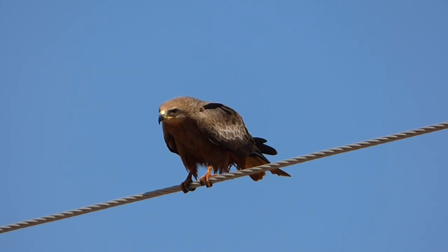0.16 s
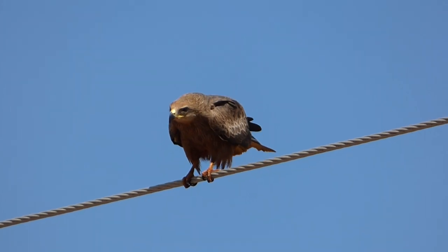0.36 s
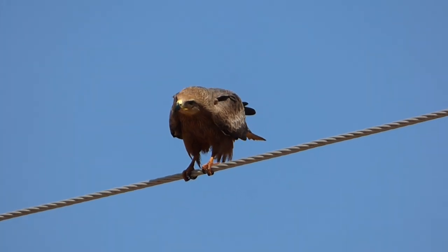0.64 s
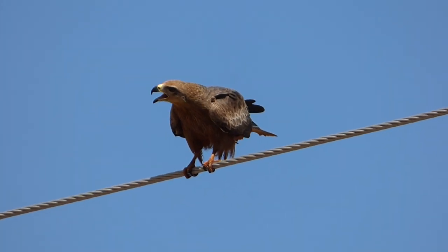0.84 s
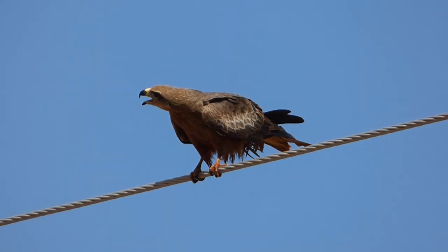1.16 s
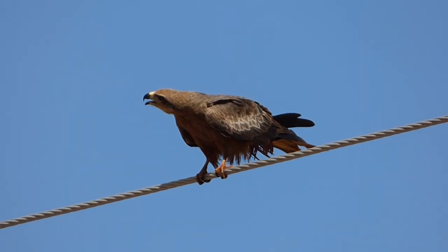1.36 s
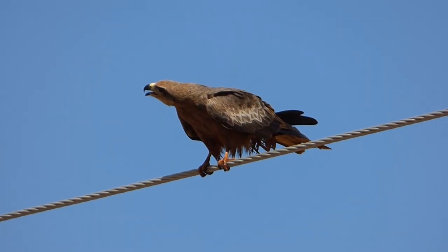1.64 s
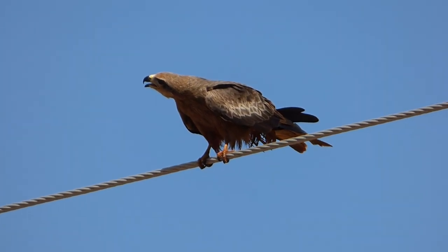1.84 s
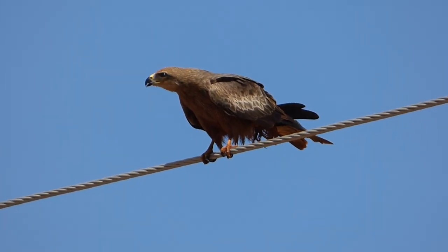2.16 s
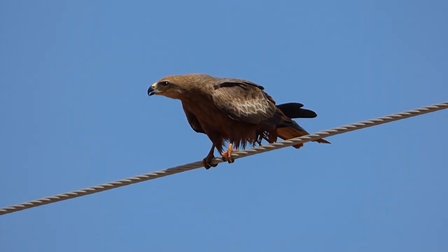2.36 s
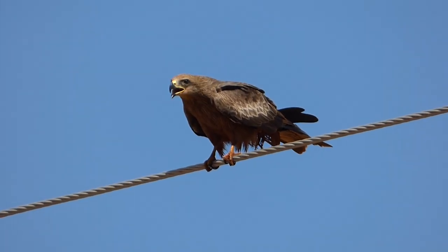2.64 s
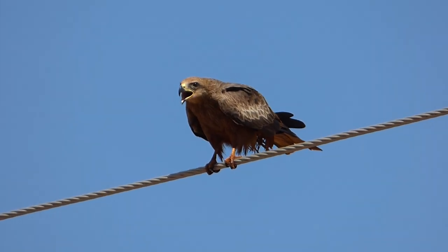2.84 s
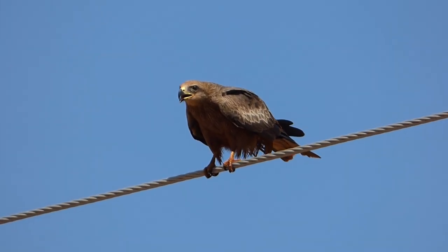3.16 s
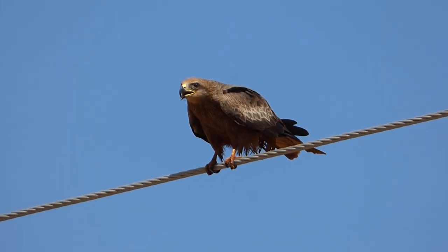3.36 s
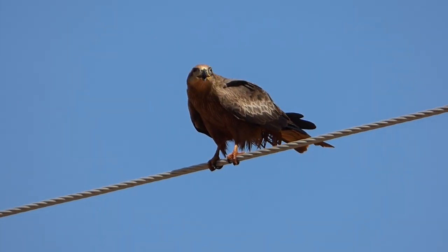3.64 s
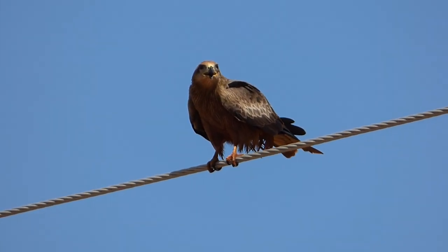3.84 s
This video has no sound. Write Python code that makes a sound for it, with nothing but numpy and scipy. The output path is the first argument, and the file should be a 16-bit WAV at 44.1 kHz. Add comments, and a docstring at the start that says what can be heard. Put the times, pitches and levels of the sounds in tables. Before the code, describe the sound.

In the open air, a bird of prey gives a high whistle that slides into a wavering trill, pauses, then calls again more shrilly. Behind it are a faint far-off drone and soft wind puffs on the microphone.

```python
"""A black kite calls twice from a wire: each call is a sharp falling whistle that runs into a long trill.
Its syrinx sings a nearly pure tone, roughened by fluttering membranes and coloured by the throat,
which rasps at the edges of the notes. The second call is brighter and breaks upward twice.
Light wind bumps the microphone over a distant rush with a surging drone, and there are two tiny ticks."""
import sys
import numpy as np
from scipy import signal
from scipy.fft import rfft, irfft, next_fast_len
from scipy.io import wavfile
from scipy.ndimage import uniform_filter1d, map_coordinates

SR = 44100
rng = np.random.default_rng(int(sys.argv[2]) if len(sys.argv) > 2 else 0)


def file_out(sig):
    """Save sig as 16-bit WAV at sys.argv[1]."""
    # one column per channel
    cols = np.atleast_2d(sig).T
    # limit, then scale
    lim = np.clip(cols, -1, 1)
    pcm = np.round(lim * 32767).astype(np.int16)
    wavfile.write(sys.argv[1], SR, pcm)


N = 176400

# The throat's resonances. Each row: frequency in Hz, gain in dB for each pass through them.
THROAT = [(1800, -13.5), (2190, -1.5), (3600, 3), (4300, -1), (10600, -1), (11300, -7), (12400, 0)]


def amp(db):
    """Decibels to gain."""
    return 10 ** (np.asarray(db) / 20)


def unit(x):
    """Scale to rms 1."""
    return x / np.sqrt(np.mean(x ** 2) + 1e-20)


def clock():
    """Time of each sample in seconds."""
    return np.arange(N) / SR


def along(points, hz):
    """Read a curve of (Hz, value) points on a log frequency axis."""
    f, v = np.transpose(points)
    return np.interp(np.log(hz + 1), np.log(f + 1), v)


def curves(rows):
    """One automation curve for each column after the time."""
    times, *columns = np.transpose(rows)
    return [np.interp(clock(), times, column) for column in columns]


def wobble(rate):
    """A smooth random curve, rate knots a second."""
    return map_coordinates(rng.standard_normal(int(N * rate / SR) + 4), [np.arange(N) * rate / SR])


def filtered(x, response):
    """Filter x by a gain given as a function of Hz."""
    size = next_fast_len(N + 8192)
    return irfft(rfft(x, size) * response(np.fft.rfftfreq(size, 1 / SR)), size)[..., :N]


def coloured(x, points):
    """EQ x by (Hz, dB) points, then scale to rms 1."""
    return unit(filtered(x, lambda hz: amp(along(points, hz))))


def panned(x, balance):
    """Pan each frequency by (Hz, left minus right dB) points."""
    return filtered(x, lambda hz: amp(np.outer([.5, -.5], along(balance, hz))))


def turns(hz):
    """Running phase of a frequency curve, in radians."""
    return 2 * np.pi * np.cumsum(hz) / SR


def gate(start, end, edge):
    """Open and close with soft fades, edge seconds long."""
    t = clock()
    return np.sin(np.pi / 2 * np.clip(np.minimum(t - start, end - t) / edge + .5, 0, 1)) ** 2


def bell(centre, half):
    """A bell-shaped envelope, down to 1/e at half seconds either side of its centre."""
    return np.exp(-((clock() - centre) / half) ** 2)


def swells(rows):
    """Bell-shaped swells of (centre s, half length s, dB), summed in power."""
    return np.sqrt(sum((amp(db) * bell(s, half)) ** 2 for s, half, db in rows))


def distant_rush():
    """A hollow, far-off bed of noise whose level wavers."""
    # EQ of the mid and side channels. Each row: frequency in Hz, relative level in dB.
    mid_colour = [(25, -24.5), (125, -7.5), (220, -14), (350, -6), (395, -15.5), (455, 3), (560, -17),
                  (640, -8), (745, -1.5), (880, -15.5), (1190, -12.5), (3000, -52)]
    side_colour = [(240, -32), (455, -14), (565, -21), (635, -9.5), (790, -5.5), (3000, -51.5)]
    # Stereo lean. Each row: frequency in Hz, left minus right in dB.
    balance = [(290, 1), (470, -9.5), (650, 4.5), (820, -6), (1200, -1)]
    common, own = rng.standard_normal((2, N))
    shifted = filtered(common, lambda hz: np.exp(1.18j))  # both ports hear it, out of phase
    mid = amp(-50.5) * coloured(common, mid_colour)
    side = amp(-51) * coloured(.69 * shifted + .62 * own, side_colour)
    return panned(np.array([mid + side, mid - side]), balance) * amp(2 * wobble(45))


def hiss_and_hum():
    """A thin, wide hiss and a weak low hum toward the right."""
    # EQ of the hiss. Each row: frequency in Hz, relative level in dB.
    colour = [(1000, -24), (1900, -2), (9000, -13.5), (15500, -19)]
    hum_hz = 159
    hiss = amp(-65.5) * coloured(rng.standard_normal((2, N)) + .93 * rng.standard_normal(N), colour)
    hum = amp(-65) * np.sin(turns(hum_hz * (1 + .0066 * wobble(5.33))))
    return hiss + np.outer([.7, 1.6], hum)


def wind():
    """Puffs strike the microphone's ports, mostly the left; the hardest boom for a few cycles."""
    # Soft puffs. Each row: centre in seconds, half length in seconds, level on the left in dB.
    bumps = [(.73, 0.13, -52), (0.88, 0.064, -43), (1.325, 0.1, -40), (1.55, 0.11, -51.5),
             (2.983, 0.02, -47.5)]
    # Their rumble. Each row: frequency in Hz, relative level in dB.
    colour = [(25, -20), (110, -0.5), (220, -5), (700, -65)]
    # Hard puffs. Each row: centre in seconds, half length in seconds, envelope peak on the left in dB.
    hard_puffs = [(1.247, 0.0065, -34), (1.448, 0.0058, -26)]
    boom_hz = 171.6
    eddies = rng.standard_normal((2, N)) + rng.standard_normal(N)
    booms = sum(amp(db) * bell(s, half) * np.sin(2 * np.pi * boom_hz * (clock() - s))
                for s, half, db in hard_puffs)
    return (swells(bumps) * coloured(eddies, colour) + booms) * amp([[0 + 1], [-9]])


def drone():
    """A far, wavering tone that comes and goes."""
    # Its surges. Each row: centre in seconds, half length in seconds, level in dB.
    surges = [(.93, 0.15, -51.5), (1.33, 0.15, -54), (2.75, .35, -57), (3.77, 0.088, -52.5)]
    pitch_hz, wander = 734, .01433
    return swells(surges) * np.sqrt(2) * np.sin(turns(pitch_hz * (1 + wander * wobble(60))))


def rasps():
    """Slow, uneven pulses and air ring in the throat's resonances."""
    # Each row is a rasp: start in seconds, length in seconds, pulse rate in Hz, level in dB.
    bursts = [(0.922, 0.032, 874, -54), (1.259, 0.04, 771, -50.5), (1.343, 0.02, 800, -52),
              (3.913, 0.0306, 745, -47.5), (3.976, 0.017, 779, -46.5)]
    # Their EQ. Each row: frequency in Hz, relative level in dB.
    colour = [(900, -48), (1500, -2), (2300, -0.5), (3100, 8), (4400, -10), (15000, -36)]
    pulse_hz, = curves([(s + length / 2, hz) for s, length, hz, _ in bursts])
    phase = turns(pulse_hz * (1 + .05 * wobble(250)))
    pulses = unit(sum(np.cos(k * phase) for k in range(1, 15)))
    level = sum(amp(db) * gate(s, s + length, edge=.0081) for s, length, _, db in bursts)
    return level * coloured(pulses + .55 * rng.standard_normal(N), colour)


def flutter_phase():
    """Phase of the membranes' uneven flutter, slower than the sung pitch."""
    flutter_hz, jitter = 900, .14
    return turns(flutter_hz * (1 + jitter * wobble(400)))


def syrinx(start, end, hz, levels, top_db, rough_db):
    """A tone with flutter sidebands, through the throat; top_db sets harmonics 4-6 against the third."""
    jitter, shimmer_db, overtone_waver_db = .0034, 1.3, 3
    opening = gate(start, end, edge=.0044)
    hz = uniform_filter1d(hz, size=350) * (1 + jitter * wobble(rate=500))
    buzz = amp(rough_db) * opening * (np.exp(1j * flutter_phase()) + wobble(2500))
    phase, tone = turns(hz), np.zeros(N)
    for k, db in enumerate(levels + [levels[2] + offset for offset in top_db], 1):
        waver = min(k - 1, 2) / 2 * overtone_waver_db * wobble(90)
        partial = np.imag(np.exp(1j * k * phase) * (1 + np.sqrt(k) * buzz))
        tone += amp(db + waver + along(THROAT, k * hz)) * partial * (k * hz < SR / 2)
    return np.sqrt(2) * tone * opening * amp(shimmer_db * wobble(150))


def whistles():
    """The syrinx glides through two notes in the first call and four in the second."""
    # The notes. Each row: time in seconds, pitch in Hz, harmonics 1, 2 and 3 in dB before the throat.
    opening = [(0.939, 2475, -51.5, -47.5, -45), (.962, 2765, -34.5, -33, -44.5),
               (0.984, 2840, -37, -40, -56), (1.01, 2766, -38.5, -41.5, -48.5),
               (1.041, 2494, -50.5, -49, -50), (1.118, 2380, -54, -67, -72), (1.205, 2343, -58.5, -80, -90)]
    yelp = [(1.272, 2290, -46, -67, -70), (1.29, 2504, -45, -43.5, -50), (1.311, 2552, -44.5, -40.5, -53.5),
            (1.347, 2163, -39, -66, -57)]
    rise = [(2.913, 2636, -44.5, -49, -52), (2.925, 2773, -37.5, -32, -37.5), (2.946, 3100, -28, -38, -54)]
    shriek = [(2.948, 3540, -31, -39, -44), (2.959, 3520, -29, -42, -44), (2.98, 3435, -34, -35.5, -48),
              (2.999, 3200, -46.5, -46, -53)]
    hold = [(3.001, 2815, -36, -36, -56), (3.027, 2641, -41.5, -39, -45), (3.07, 2682, -40, -42, -62.5),
            (3.191, 2620, -39.5, -49.5, -69), (3.215, 2710, -43.5, -54, -74)]
    upward_break = [(3.222, 3095, -47.5, -64, -75), (3.262, 3190, -43.5, -55, -79),
                    (3.281, 3110, -46, -69, -67)]
    # Roughness of each note in turn, in dB against its tone.
    roughness = [-27, -21, -24.5, -40, -33, -36]
    voice = np.zeros(N)
    for note, rough_db in zip((opening, yelp, rise, shriek, hold, upward_break), roughness):
        hz, *levels = curves(note)
        voice += syrinx(note[0][0], note[-1][0], hz, levels, top_db=[-22, -35, -44], rough_db=rough_db)
    return voice


def hoarse_air():
    """Air forced through the throat, pulsing with the membranes' flutter."""
    # Each row is a push of air: centre in seconds, half length in seconds, level in dB.
    pushes = [(1.295, .03, -64), (2.967, .023, -50), (3.82, .22, -64.5)]
    # Its EQ. Each row: frequency in Hz, relative level in dB.
    colour = [(1800, -30), (3000, 0), (4500, -9), (6500, -2), (9000, -4), (14000, -13)]
    air = rng.standard_normal(N) * (1 + np.cos(flutter_phase()))
    return swells(pushes) * coloured(air, colour)


def trill(pitch, loudness, swing_db, rough_db, flicker_db):
    """The pitch quavers, harmonics 1-3 shift by swing_db at each crest, and the overtones flicker."""
    # Catches in the voice. Each row: centre and half length in seconds, dip in dB, pitch lift in Hz.
    catches = [(1.646, 0.009, 16.5, 133), (1.806, 0.0071, 13, 152), (3.93, 0.012, 35, -1)]
    start, end = pitch[0][0], pitch[-1][0]
    centre_hz, depth_hz, rate = curves(pitch)
    quaver = -np.cos(turns(rate * (clock() >= start)))
    dip_db, lift_hz = sum(np.outer([db, hz], bell(s, half)) for s, half, db, hz in catches)
    levels = [db + swing * quaver - dip_db + (k > 0) * flicker_db * np.tanh(wobble(rate=30))
              for k, (db, swing) in enumerate(zip(curves(loudness), swing_db))]
    hz = centre_hz + depth_hz * quaver + lift_hz
    return syrinx(start, end, hz, levels, top_db=[-33, -16, -21], rough_db=rough_db)


def trills():
    """The quavering tail of each call: the first clean, the second brighter and growing rough."""
    # Pitch moves. Each row: time in seconds, centre pitch in Hz, quaver depth in Hz, quavers a second.
    pitch_1 = [(1.355, 2330, 18, 21.4), (1.42, 2374, 47, 18.93), (1.47, 2254, 61, 17),
               (1.63, 2346, 38, 20.8), (1.79, 2278, 67, 18.4), (1.88, 2200, 93, 17.2),
               (1.97, 2240, 51, 19.83), (2.07, 2138, 125, 17.8), (2.215, 2165, 174, 16.5)]
    pitch_2 = [(3.282, 2500, -38, 16), (3.32, 2528, 62, 19.2), (3.39, 2430, 16, 20.8), (3.47, 2454, 54, 18),
               (3.55, 2428, 67, 19), (3.7, 2420, 58, 20), (3.8, 2464, 83, 18.05), (3.89, 2410, 91, 17.6),
               (3.94, 2404, 56, 15), (3.995, 2550, 193, 19.8)]
    # Level moves. Each row: time in seconds, harmonics 1, 2 and 3 in dB before the throat.
    loudness_1 = [(1.355, -55, -80, -73), (1.372, -44, -55, -63), (1.48, -41, -70, -72),
                  (1.7, -39, -73, -78), (2.08, -40.5, -67, -68.5), (2.215, -44.5, -68.5, -82)]
    loudness_2 = [(3.282, -42.5, -43, -58), (3.315, -42.5, -48.5, -66), (3.339, -42.5, -42, -49.5),
                  (3.47, -42, -45.5, -51.5), (3.79, -39, -44, -52), (3.9, -38.5, -45.5, -52),
                  (3.976, -40, -43, -46.5), (3.995, -55, -60, -78)]
    # The second trill's grit. Each row: time in seconds, roughness in dB against the tone.
    roughness = [(3.6, -27), (3.75, -19.5)]
    first = trill(pitch_1, loudness_1, swing_db=[0, -3.5, -6], rough_db=-56, flicker_db=6)
    second = trill(pitch_2, loudness_2, swing_db=[-.5, 1.5, -1.5], rough_db=curves(roughness)[0],
                   flicker_db=-.5)
    return first + second


def ticks():
    """Tiny dry ticks: bright noise that dies almost at once."""
    # Each row is a tick: start in seconds, level in dB.
    hits = [(1.997, -47), (2.534, -33)]
    # Their EQ. Each row: frequency in Hz, relative level in dB.
    colour = [(5000, -36), (7800, 0), (15000, -2)]
    t, decay_s = clock(), .0003
    level = sum(amp(db) * (t >= s) * np.exp(-np.abs(t - s) / decay_s) for s, db in hits)
    return level * coloured(rng.standard_normal(N), colour)


def second_tones():
    """A faint, independent tone in the voice beats with the second trill."""
    # Each row is a glide: start and length in seconds, first and last pitch in Hz, level in dB.
    glides = [(3.345, 0.073, 2256, 2340, -49.5), (3.395, 0.387, 2833, 2953, -57)]
    tones, drift = np.zeros(N), 1 + .0049 * wobble(300)
    for s, length, start_hz, end_hz, db in glides:
        hz = np.interp(clock(), [s, s + length], [start_hz, end_hz]) * drift
        tones += amp(db) * gate(s, s + length, edge=.0059) * np.sqrt(2) * np.sin(turns(hz))
    return tones


def kite():
    """Both calls take a second pass of throat colour, then air, second tones and rasps join them."""
    voice = filtered(whistles() + trills(), lambda hz: amp(along(THROAT, hz)))
    return voice + hoarse_air() + second_tones() + rasps()


def outdoors(x):
    """A faint, short scatter from the surroundings."""
    echo_db, t60_s = -18, .28
    t = np.arange(SR // 2) / SR
    tail = rng.standard_normal((2, len(t))) * amp(-60 * t / t60_s)
    return amp(echo_db) * signal.fftconvolve(x[None], tail / np.linalg.norm(tail[0]), axes=1)[:, :N]


def scene():
    """The bird ahead in the open air, over the distant bed and the wind."""
    # The bird's stereo lean. Each row: frequency in Hz, left minus right in dB.
    balance = [(3000, 3.5), (5000, -4), (10000, -0.3)]
    bird = kite()
    return panned(bird, balance) + outdoors(bird) + distant_rush() + hiss_and_hum() + drone() + wind() + ticks()


def record(dry):
    """The sound opens after a short silence, with the very top cut off."""
    start_s, top_hz = .3286, 15750
    return filtered(dry * (clock() >= start_s), lambda hz: hz < top_hz)


dry = scene()
out = record(dry)
file_out(out)
```